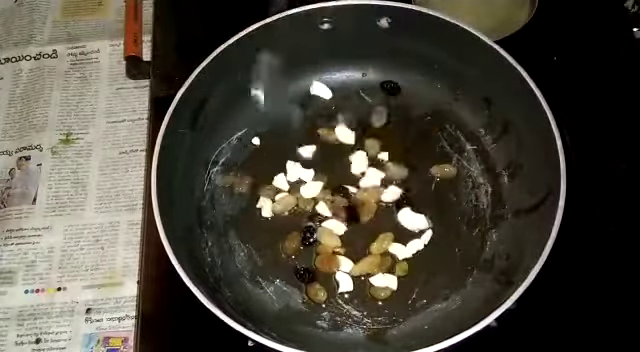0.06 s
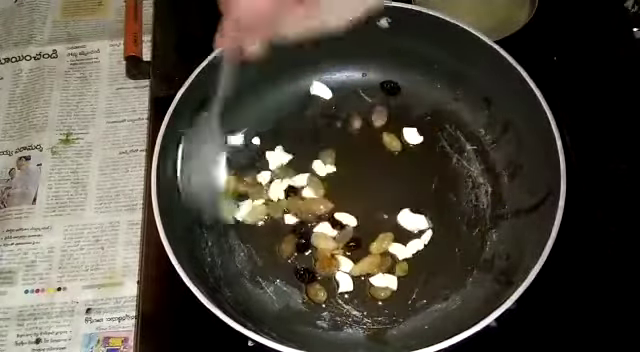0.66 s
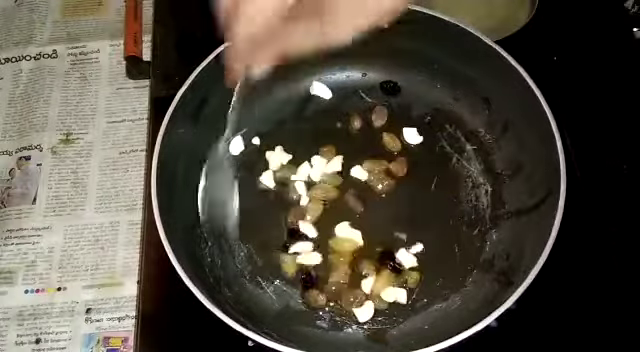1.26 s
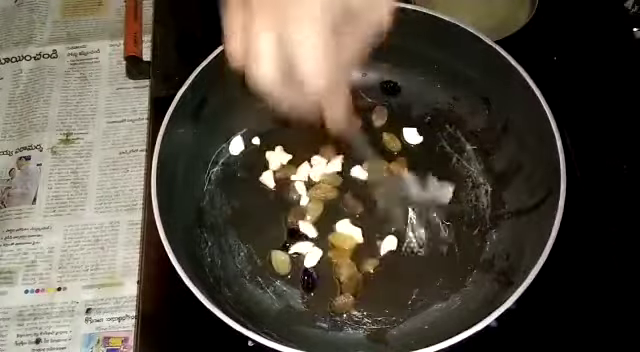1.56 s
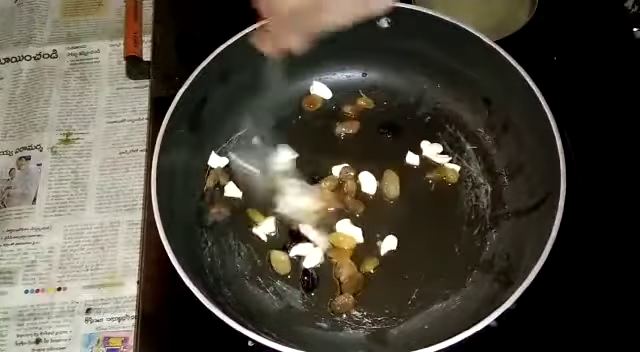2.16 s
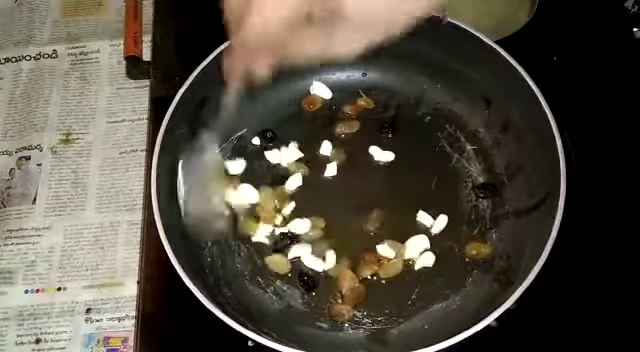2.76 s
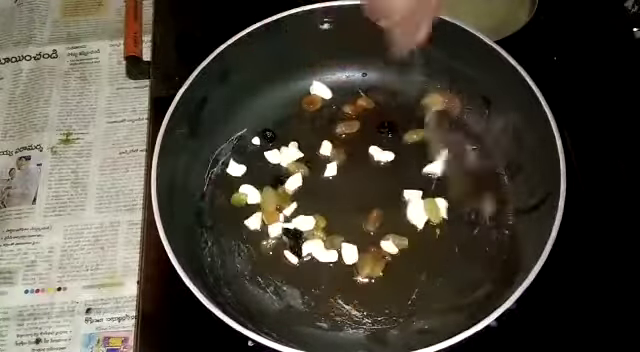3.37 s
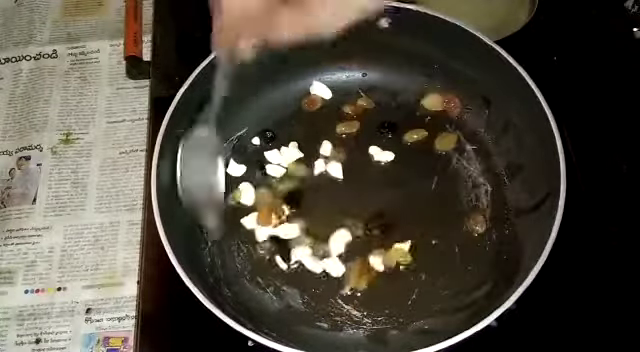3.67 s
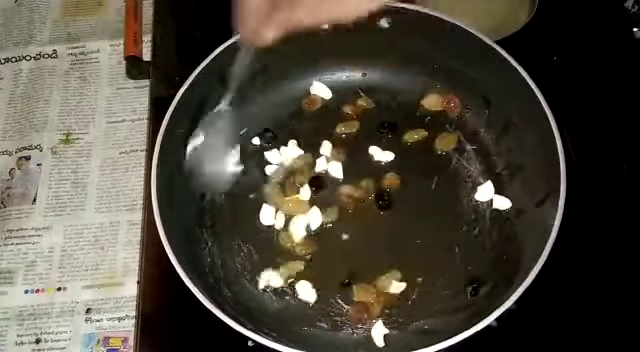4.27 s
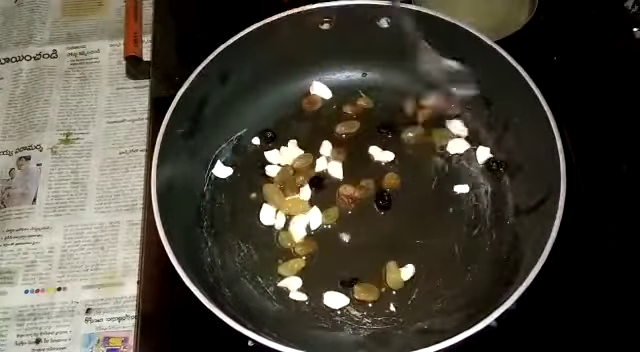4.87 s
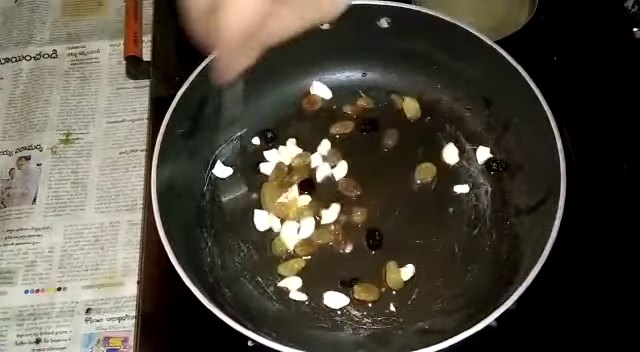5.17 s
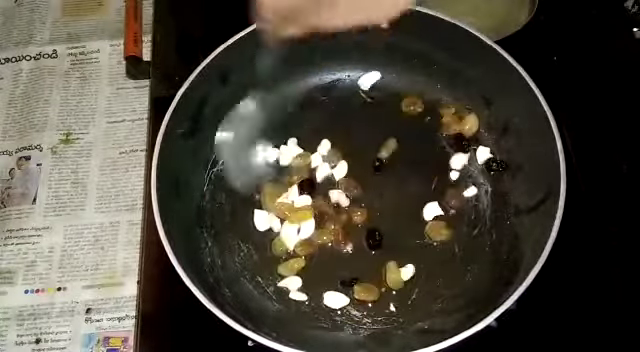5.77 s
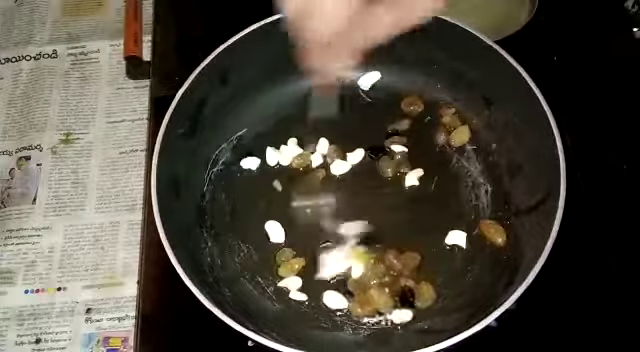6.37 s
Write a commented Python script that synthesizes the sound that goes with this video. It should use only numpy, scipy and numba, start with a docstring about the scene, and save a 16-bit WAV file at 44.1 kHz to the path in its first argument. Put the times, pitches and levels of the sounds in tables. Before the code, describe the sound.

A steel spoon stirs nuts and raisins in a nonstick pan for about six and a half seconds, heard close up in a small kitchen. From the start to around 2.7 seconds, bright, briefly ringing clinks come roughly three times a second, strongest near 1 and 1.3 seconds. Short raspy scrapes run between them, swelling near 0.7 and 1.5 seconds. A longer, softer scrape and dull low bumps follow around 3 seconds, then a double clink and scrape near 3.7 and another clink at 4.3. After light scraping, a sharp knock rings the pan wall at 4.9 seconds. A softer clink at 5.3 leads into a swelling scrape at 5.5, and a light tap comes at 6.2. Behind it all, a gas burner rumbles quietly and hot fat sizzles faintly, flaring slightly around 4 seconds.

```python
"""Bright clinks and short, raspy scrapes: a steel spoon stirs nuts and raisins in a nonstick pan.
The spoon knocks on floor and wall and rings the metal, then drags over the coating in tiny slips
that wake the same modes as the floor hits. Soft bumps add a dull, low ring.
Behind it, hot fat sizzles faintly over the rumble of a gas burner, all close up in a small kitchen."""
import sys
import numpy as np
from scipy import signal
from scipy.fft import rfft, irfft
from scipy.io import wavfile
from scipy.ndimage import uniform_filter1d
from numba import njit

SR = 44100
rng = np.random.default_rng(int(sys.argv[2]) if len(sys.argv) > 2 else 0)


def bounce(signal):
    """Save signal as a 16-bit WAV file at the path given by the first command-line argument."""
    frames = np.transpose(np.atleast_2d(signal))
    limited = np.clip(frames, -1, 1)
    pcm = np.round(limited * 32767).astype(np.int16)
    wavfile.write(sys.argv[1], SR, pcm)


N = 283122
T = np.arange(N) / SR

# Spoon hits on the pan's floor and wall. Each row: start in seconds, strength in dB,
# body in dB (how well the spot wakes the low modes), edge in dB (how much of the spoon's edge lands).
FLOOR_HITS = [(0.071, -13, 5.5, 3.5), (0.353, -13.5, -3, -11), (0.613, -13, 1, -18), (0.640, -13.5, -13, 9),
              (1.016, -8, 0.5, -1.5), (1.259, -9, 2, 1), (1.771, -11, -7, -1), (2.032, -15, -2, 4.5),
              (2.143, -17, 7, -0.5), (2.444, -12.5, -6, 1.5), (2.729, -19, -14, 12.5),
              (3.020, -27.5, -20, 5), (3.340, -36.5, 7.5, -14), (3.444, -36, 10.5, -11),
              (3.642, -16, 1, -9), (3.658, -14.5, -13, 7), (4.319, -14, -6, 3.5), (5.246, -20, 2.5, 6),
              (5.267, -20, -20, 6), (6.195, -29.5, 9, -14)]
WALL_HITS = [(4.880, -7, -2.5, 6), (5.055, -30, 8.5, 0)]
# The pan's ring, struck on floor or wall. Each row: pitch in Hz, level in dB, t60 in seconds.
FLOOR_RING = [(662, 0, .3), (712, -5, .33), (853, -15, .2), (1241, -8, .4), (1301, -6, .22),
              (1332, -8, .28), (1869, -1, .26), (1953, -5, .3), (2386, -18, .22), (3150, -17, .18),
              (3634, -18, .2), (4538, -9, .2), (5590, -16, .16), (7178, -11, .2), (7690, -17, .22),
              (7900, -14, .16), (8264, -13, .25), (8492, -14, .22), (9700, -23, .18), (10500, -27, .16),
              (11150, -27, .16), (12300, -30, .16), (14950, -27, .18)]
WALL_RING = [(662, -5, .25), (853, -9, .2), (1320, -7, .22), (1869, -3, .22), (1948, 0, .3),
             (2386, -6, .25), (2556, -1, .22), (3058, -13, .3), (3634, -6, .24), (3800, -4, .26),
             (6094, -16, .2), (7178, -11, .18), (7687, -11, .28), (8264, -5, .22), (8492, -4, .22),
             (8974, -8, .22), (9717, -15, .2), (10350, -18, .2), (11100, -13, .2), (11900, -19, .18)]
# Borders in Hz of the five mode families: lowest, low, middle, high, tick.
CROSSOVERS_HZ = [200, 1000, 2250, 6500, 10000, 16000]
# Spoon drags. Each row: start, hardest push and end in seconds, then level, swell up to the push,
# boom of the lowest modes and rasp, all in dB.
SPOON_DRAGS = [(0.377, 0.425, 0.45, -29.5, 4.5, 1, 3.5), (0.707, 0.745, 0.770, -23, 11, -2.5, -2),
               (1.045, 1.055, 1.072, -21.5, -2, -3, -8.5), (1.29, 1.3, 1.41, -34.5, 3, -7, 2),
               (1.387, 1.54, 1.592, -20, 13, -9, -10), (2.153, 2.15, 2.22, -24.5, -13, -5.5, -2.5),
               (2.481, 2.492, 2.518, -28.5, 3, 0.5, 5), (2.787, 2.897, 3.092, -28, 5, -5, -1),
               (3.714, 3.773, 3.805, -25, 10, 1.5, 0), (4.362, 4.498, 4.590, -33, 5.5, 5, 5),
               (4.597, 4.696, 4.708, -34, 5, 4, 2), (5.344, 5.504, 5.566, -19, 16.5, -6, -2)]
# Broad resonances under the pressed spoon. Each row: centre in Hz, width in Hz, level in dB.
PRESSED_MODES = [(700, 102, -4.5), (848, 44, -7.5), (1363, 85, 0.5), (1895, 82, 3), (2640, 23, -8),
                 (2944, 140, -7), (3240, 220, 0), (4300, 43, -10), (4270, 130, -24), (4810, 280, -6),
                 (5680, 750, -6), (6430, 114, -11), (7080, 150, -6), (7700, 80, -17), (8550, 480, -5),
                 (9600, 57, -45)]
# Soft bumps against the pan. Each row: start in seconds, level at its loudest in dB.
PAN_BUMPS = [(1.045, -22), (2.696, -29), (2.520, -22), (3.030, -18.5), (3.350, -32.5), (3.665, -17),
             (4.135, -37.5), (5.005, -33.5), (5.275, -21)]
# The sizzle flares as fruit slides onto hot metal. Each row: start and hold in seconds, level in dB.
SIZZLE_FLARES = [(3.213, 0.32, -56), (3.978, 0.12, -45.5), (5.65, 0.19, -54)]
# Tone curves of a hit's clack, the smooth rasp, fat and flame. Each row: frequency in Hz, gain in dB.
CLACK_EQ = [(250, -14), (450, -12.5), (560, -5), (690, -0.5), (850, -1), (1030, -29), (1320, 4), (1620, -6),
            (1900, 5), (2700, -3.5), (4500, 2), (6200, -4.5), (8000, 7), (10500, -9.5), (12300, -13),
            (15000, -41)]
RASP_EQ = [(150, -22), (250, -9), (500, -11), (800, -4), (1000, -12), (1330, 1), (1620, -12), (2100, -4),
           (2700, -6), (3800, -6), (8200, -4), (9500, -9), (11000, -18), (13500, -34), (16000, -40)]
SIZZLE_EQ = [(500, -20), (1200, -4), (2800, 4.5), (5700, 1), (8500, 1), (10500, -6.5), (13000, -12.5),
             (15500, -15)]
FLAME_EQ = [(30, -29), (48, -30), (75, -17), (100, -26), (140, -6.5), (300, -7), (480, -1.5), (680, -9.5),
            (900, -18), (1400, -15), (2500, -22), (4000, -40), (9000, -82)]
# Low drones of stove and room. Each row: centre in Hz, filter width in Hz, level in dB on the fader.
STOVE_DRONES = [(59, 15, -2.5), (93, 36, -2), (185.5, 14.6, -9), (231.8, 21.5, -11), (368.7, 55, -8)]
# The drones' shared fader. Each row: time in seconds, level in dB.
DRONE_FADER = [(0.0, -46), (0.09, -45.5), (1.02, -49), (1.16, -45.5), (1.84, -46), (1.9, -45), (3.42, -48),
               (3.59, -43.5), (5.36, -44.5), (5.42, -48), (5.78, -44), (6.42, -44.5)]


def spoon_hits(hits, modes, ring_db, trim_db):
    """Steel strikes the pan; per family, ring_db sets ring against clack and trim_db trims the level."""
    out = np.zeros(N + SR)
    for start_s, strength_db, body_db, edge_db in hits:
        hit = clink(family_levels(strength_db, body_db, edge_db) + trim_db, modes, ring_db)
        start = int(start_s * SR)
        out[start:start + len(hit)] += hit
    return out[:N]


def family_levels(strength_db, body_db, edge_db, weight_db=-13.5, weight_share=0.39, tick_db=-11.5):
    """A hit's five family levels in dB: edge-on, it tilts from middle to high and sharpens the tick."""
    lowest_db = weight_db + weight_share * strength_db  # these answer mostly to the spoon's weight
    tilt_db = 0.24 * edge_db
    return np.array([lowest_db, strength_db + body_db, strength_db - tilt_db,
                     strength_db + tilt_db, strength_db + edge_db + tick_db])


def clink(family_db, modes, ring_db, crack_db=2, scatter_db=2, crowd_size=150):
    """One hit: a clack (noise crack plus a crowd of short modes) over the pan's long ring."""
    t = T[:SR // 2]
    hz, db, t60 = np.transpose(modes)
    spot, touch = rng.standard_normal((2, len(hz)))
    hz = hz * (1 + .0025 * touch)  # the touching spoon detunes the modes a little
    long_ring = ring(hz, undb(db + scatter_db * spot) * rng.choice([-1, 1], len(hz)), t60, len(t))
    crowd_hz = np.linspace(300, 15500, crowd_size) + rng.uniform(-50, 50, crowd_size)
    crowd_gain = gain_at(crowd_hz, CLACK_EQ) * rng.standard_normal(crowd_size)
    crowd_t60 = 0.057 * (4000 / crowd_hz) ** .5  # spoon and fat damp higher modes sooner
    crowd = ring(crowd_hz, crowd_gain, crowd_t60, SR // 6)
    crowd = np.pad(crowd, (0, len(t) - len(crowd)))
    crack = colour(rng.standard_normal(len(t)), CLACK_EQ) * fade(t, t60=.014)
    clack = kitchen(unit(crowd) + undb(crack_db) * unit(crack), wet_db=-6)
    out = 0
    for lo, hi, level_db, share_db in zip(CROSSOVERS_HZ, CROSSOVERS_HZ[1:], family_db, ring_db):
        family = peak_unit(band(clack, lo, hi)) + undb(share_db) * peak_unit(band(long_ring, lo, hi))
        out = out + undb(level_db) * peak_unit(family)
    return out


def spoon_scrapes(grit_db=-7, ring_db=-8, smooth_db=-7.5, family_db=(-2, 0, 0)):
    """Dense stick-slip clicks and a few catches on grit drive the pressed and the free modes."""
    grit = clicks(per_s=170, spread_db=3)
    slips = clicks(per_s=5000, spread_db=5) * undb(1.5 * walk(90))
    friction = rim_echoes(slips + undb(grit_db) * grit)
    pressed = sum(undb(db) * resonate(friction, hz, width) for hz, width, db in PRESSED_MODES)
    free = sum(undb(db) * resonate(friction, hz, 4 / t60) for hz, db, t60 in FLOOR_RING)
    smooth = colour(friction, RASP_EQ)
    body = unit(pressed) + undb(ring_db) * unit(free) + undb(smooth_db) * unit(smooth)
    # the soft coating dulls the top of the rasp, up to a thin whistle of the spoon's edge
    body = colour(body, [(9000, 1.5), (11500, -12.5), (14000, -17), (15000, -11)])
    lowest = band(body, CROSSOVERS_HZ[0], CROSSOVERS_HZ[1])
    low = band(body, CROSSOVERS_HZ[1], CROSSOVERS_HZ[2])
    rasp = moving_contact(band(body, CROSSOVERS_HZ[2], CROSSOVERS_HZ[-1]))
    layers = (undb(family_db[k]) * unit(x) * drag_pressure(k) for k, x in enumerate([lowest, low, rasp]))
    return kitchen(sum(layers), wet_db=-8)


def drag_pressure(family, attack_s=0.0089, release_s=0.013, judder_db=-1):
    """Envelope of family 0 (lowest), 1 (low) or 2 (rasp): each drag swells, slows and lifts off."""
    swell_share = (0.2, 1, 0.76)[family]
    slowing_db = (2, 5, 11)[family]
    out = np.zeros(N)
    for start, push, end, level_db, swell_db, boom_db, rasp_db in SPOON_DRAGS:
        contact = np.clip((T - start) / attack_s + 1, 0, 1) * np.clip((end - T) / release_s + 1, 0, 1)
        arch_db = np.interp(T, np.sort([start, push, end]), [-swell_db * swell_share, 0, -slowing_db])
        out += contact * undb(level_db + (boom_db, 0, rasp_db)[family] + arch_db)
    return out * undb(judder_db * walk(per_s=27))


def rim_echoes(x, paths_s=(.0005, .0013, .0031), echo=.45, drift=.05):
    """Waves return from the rim along paths that change as the spoon moves, so the colour shifts."""
    return x + echo * sum(np.interp(T - path * (1 + drift * walk(11)), T, x) for path in paths_s)


def moving_contact(x, depth_db=2.1):
    """As the contact point moves, each group of higher modes is driven harder or softer."""
    groups_hz = [(2250, 3500), (3500, 5100), (5100, 6700), (6700, 9000), (9000, 16000)]
    return sum(band(x, lo, hi, order=2) * undb(depth_db * walk(per_s=16)) for lo, hi in groups_hz)


def soft_bumps(cutoff_hz=800, attack_s=0.0087, ring_share=0.77):
    """A slow push rings the pan's lowest modes and hardly any above; the contact shortens the ring."""
    hz, db, t60 = np.transpose(FLOOR_RING)
    attack = np.clip(T[:SR // 2] / attack_s, 0, 1)
    out = np.zeros(N + SR)
    for start_s, level_db in PAN_BUMPS:
        gain = undb(db) / (1 + (hz / cutoff_hz) ** 2) ** 2 * rng.choice([-1, 1], len(hz))
        bump = ring(hz, gain, t60 * ring_share, len(attack)) * attack
        start = int(start_s * SR)
        out[start:start + len(bump)] += undb(level_db) * peak_unit(bump)
    return out[:N]


def fat_sizzle(bed_db=-55, rise_s=0.087, decay_s=0.62):
    """Tiny steam bubbles burst in the fat; over a steady bed, each flare rises, holds and dies away."""
    pops = colour(clicks(per_s=5000, spread_db=2.5), SIZZLE_EQ)
    fizz = kitchen(pops, wet_db=-12)
    power = undb(bed_db) ** 2
    for start, hold, db in SIZZLE_FLARES:
        age = T - start
        flare = np.clip(age / rise_s, 0, 1) * np.exp(-np.maximum(age - rise_s - hold, 0) / decay_s)
        power = power + (undb(db) * flare) ** 2
    return unit(fizz) * np.sqrt(power)


def gas_burner(flame_db=-47):
    """The flame's fluttering rush over a few narrow drones that swell and sink."""
    flutter = undb(1.2 * walk(per_s=9))
    flame = unit(colour(rng.standard_normal(N), FLAME_EQ)) * undb(flame_db) * flutter
    drones = 0
    for hz, width, db in STOVE_DRONES:
        hum = resonate(rng.standard_normal(N), hz, width)
        drones += undb(db) * unit(resonate(hum, hz, width))  # filtered twice for steeper skirts
    return flame + drones * undb(np.interp(T, *np.transpose(DRONE_FADER)))


def kitchen(x, wet_db, t60_low=0.4, t60_high=0.27):
    """Direct sound plus the short tail of hard kitchen walls."""
    t = T[:SR // 3]
    noise = rng.standard_normal((2, len(t)))
    low = band(noise[0], 225, 1560, order=2) * fade(t, t60_low)
    high = band(noise[1], 2520, 21800, order=2) * fade(t, t60_high)
    tail = (low + high) * np.clip((t - .003) / 0.00067, 0, 1)  # 3 ms pre-delay
    return x + undb(wet_db) * signal.fftconvolve(x, tail / np.linalg.norm(tail))[:len(x)]


@njit
def ring(hz, gain, t60, size):
    """Sum of decaying modes."""
    pole = np.exp((2j * np.pi * hz - np.log(1000) / t60) / SR)
    state, out = gain + 0j, np.zeros(size)
    for i in range(size):
        for k in range(len(hz)):
            state[k] *= pole[k]
            out[i] += state[k].imag
    return out


def clicks(per_s, spread_db):
    """Random clicks, a few much louder than the rest."""
    chance, size, sign = rng.random(N), rng.standard_normal(N), rng.choice([-1, 1], N)
    return unit((chance < per_s / SR) * sign * undb(spread_db * size))


def walk(per_s):
    """Gliding random modulation with a spread near 1."""
    knots = rng.standard_normal(4096)
    return np.interp(T * per_s, np.arange(len(knots)), knots)


def fade(t, t60):
    """Decay by 60 dB in t60 seconds."""
    return np.exp(-np.log(1000) * t / t60)


def resonate(x, hz, width):
    """One resonance, gain 1 at its centre."""
    return signal.lfilter(*signal.iirpeak(hz, hz / width, fs=SR), x)


def band(x, lo, hi, order=4):
    """Causal band-pass."""
    return signal.sosfilt(signal.butter(order, [lo, hi], "band", fs=SR, output="sos"), x)


def colour(x, curve):
    """EQ by a (Hz, dB) curve."""
    return irfft(rfft(x) * gain_at(np.fft.rfftfreq(len(x), 1 / SR), curve), len(x))


def gain_at(hz, curve):
    """Gain of a (Hz, dB) curve at the given frequencies."""
    curve_hz, db = np.transpose(curve)
    return undb(np.interp(np.log(hz + 1), np.log(np.sort(curve_hz)), db))


def undb(db):
    """Decibels to gain."""
    return 10 ** (np.asarray(db) / 20)


def unit(x):
    """Scale to rms 1."""
    return x / np.sqrt(np.mean(x ** 2) + 1e-18)


def peak_unit(x):
    """Scale so that the loudest 4 ms have rms 1."""
    return x / np.sqrt(uniform_filter1d(x ** 2, SR // 250).max())


def scene():
    """The mono mix: spoon up front, fat and flame behind."""
    floor = spoon_hits(FLOOR_HITS, FLOOR_RING, ring_db=[-2.5, -8.5, -20, -39, -23],
                       trim_db=[-0.87, -3.75, 0.39, 1, -1.8])
    wall = spoon_hits(WALL_HITS, WALL_RING, ring_db=[-5.5, -12, -12.5, -8.5, -18],
                      trim_db=[-1, -0.6, 2.5, 0.5, 2.5])
    return (floor + wall + spoon_scrapes() + soft_bumps() + fat_sizzle() + gas_burner())[None]


def record(dry, ceiling=0.73, top_hz=15300):
    """Soft clipping rounds the loudest peaks and a steep low-pass cuts the top."""
    rounded = ceiling * np.tanh(dry / ceiling)
    return signal.sosfilt(signal.ellip(8, .2, 70, top_hz, fs=SR, output="sos"), rounded)


dry = scene()
out = record(dry)
bounce(out)
```